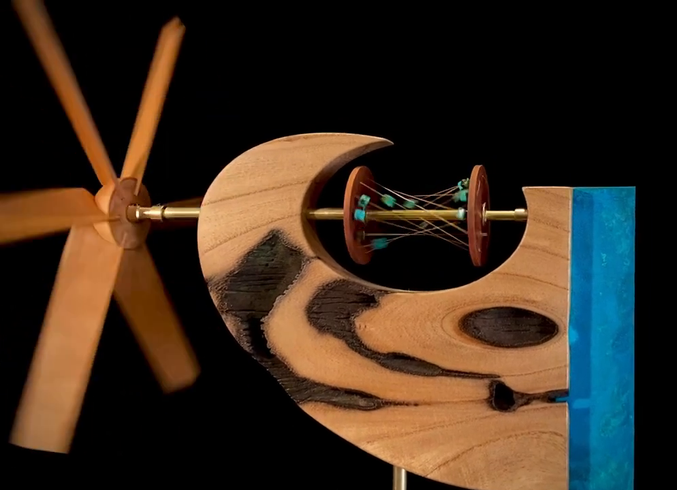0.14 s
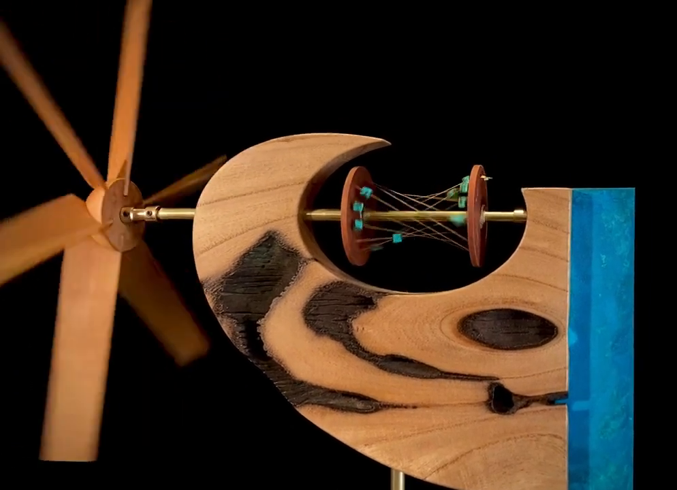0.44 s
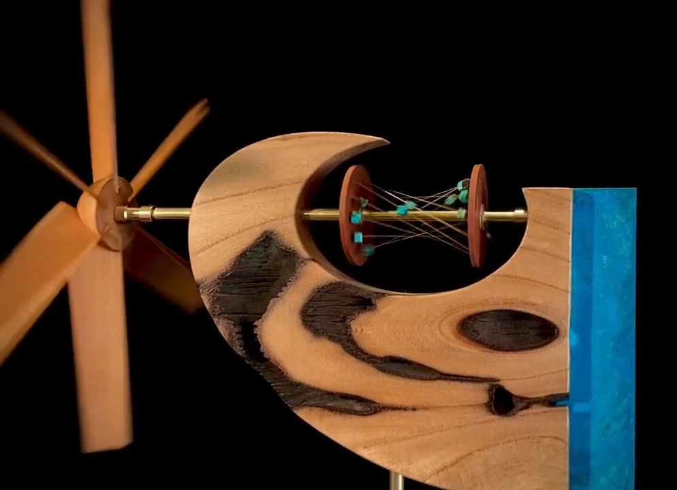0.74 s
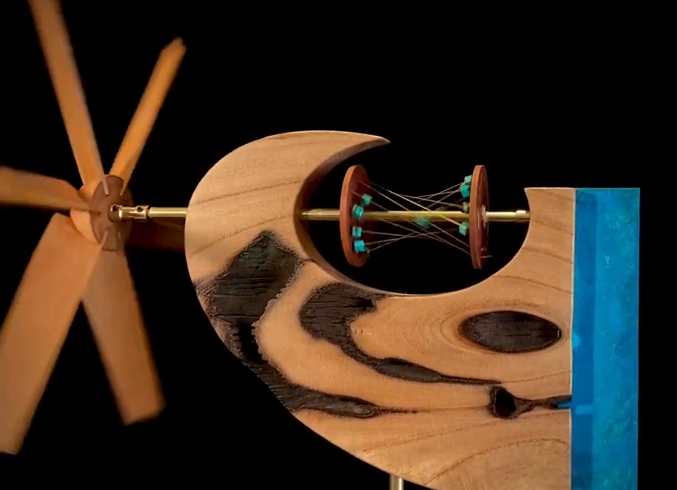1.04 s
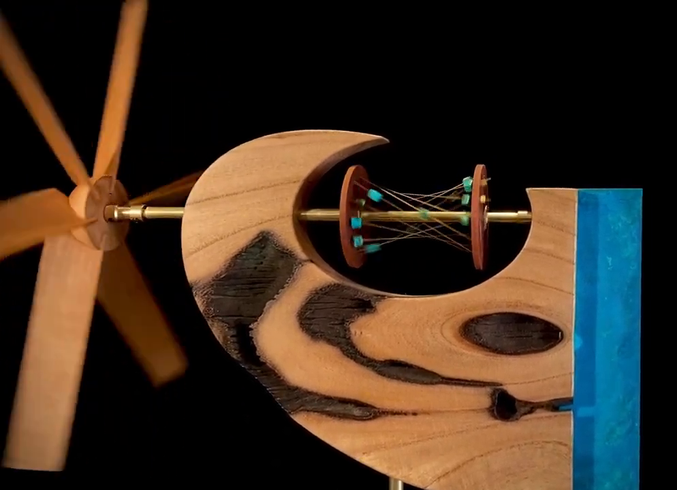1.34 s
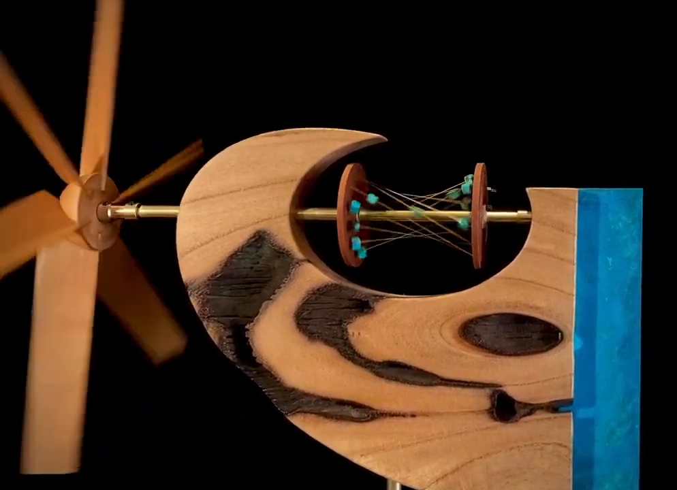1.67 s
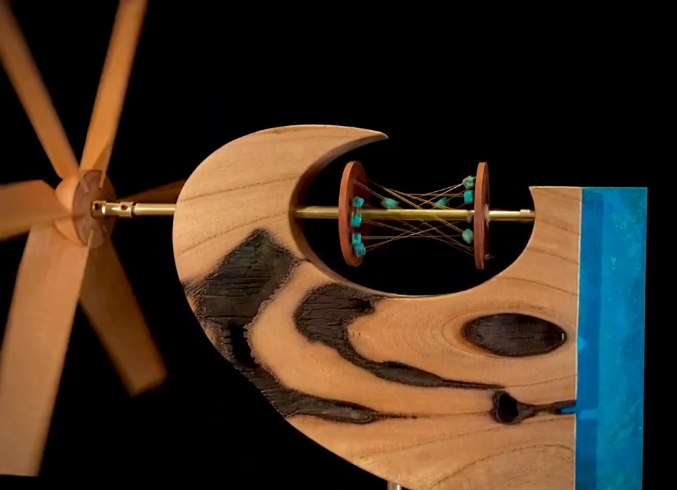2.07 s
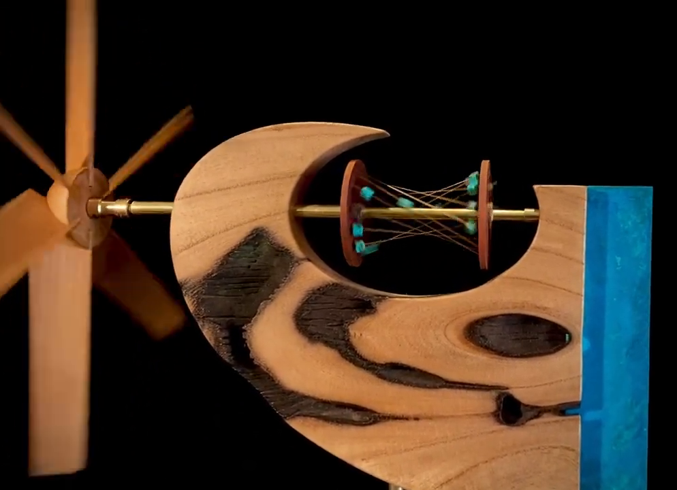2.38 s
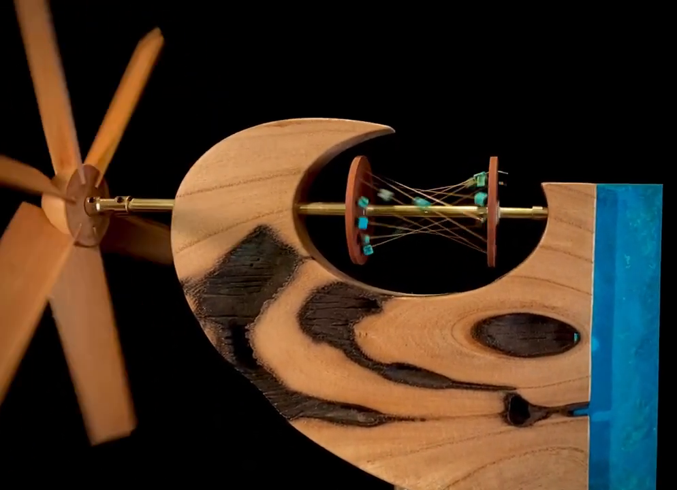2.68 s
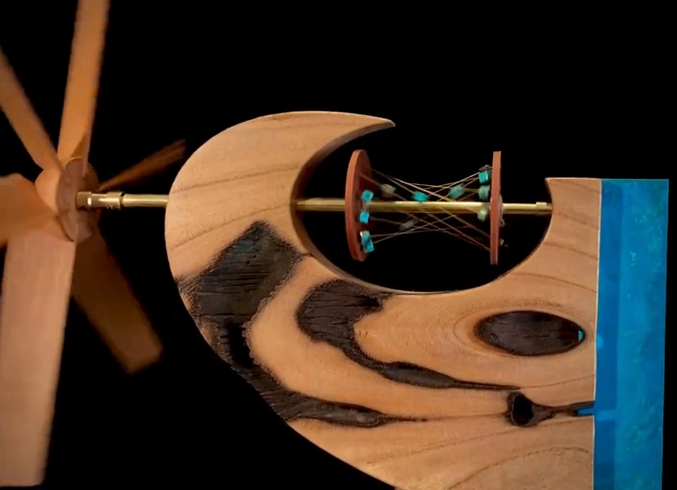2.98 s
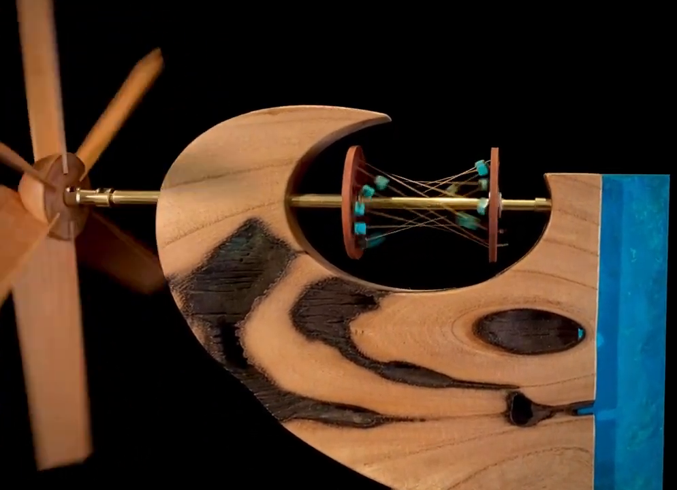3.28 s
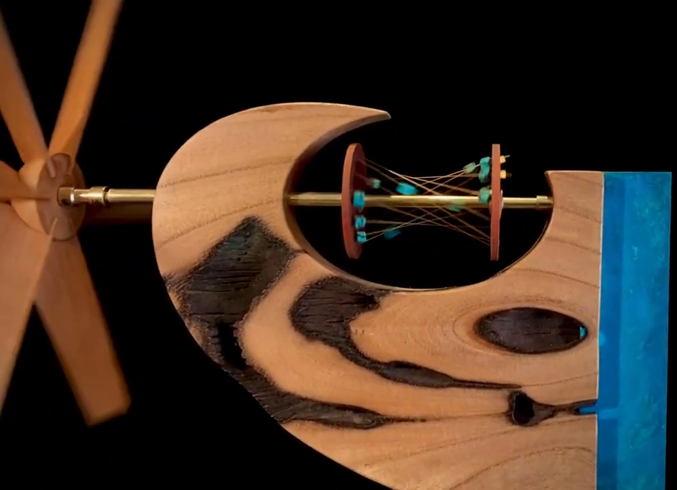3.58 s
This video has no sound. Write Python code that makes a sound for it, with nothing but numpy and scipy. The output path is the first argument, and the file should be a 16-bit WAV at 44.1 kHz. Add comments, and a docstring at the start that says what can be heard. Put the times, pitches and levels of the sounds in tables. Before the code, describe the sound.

Beads on a turning wooden spool rattle from 0 to about 3.7 seconds. Hard, bright ticks with short wooden clacks and thin brass ringing come in uneven clusters, near 0.1, 0.55, 1.0, 1.6, 2.1, 2.7 and 3.2. Between them, lighter clinks skitter along strings. Soft low frame bumps occur around 0.2, 0.7, 1.4, 1.7 and 2.8. Faint shaft rubbing, air and motor hum continue, close stereo, small room.

```python
"""A wooden whirligig turns a string spool in a small room; its shaft rubs over a low motor hum and soft air noise.
From the start, beads drop on its end discs: a hard tick, a short wooden clack and a thin ring of the brass shaft.
Soon the frame bumps softly, then beads clink together and skitter on along the strings; all this keeps recurring.
Faint touches fall at random times. Hard contacts are noise bursts through filters; wood and brass are fading
sine tones; rubbing and air are coloured noise. Two close microphones hear small differences in time and level."""
import sys
import numpy as np
from scipy import signal
from scipy.fft import rfft, irfft, next_fast_len
from scipy.io import wavfile
from scipy.ndimage import map_coordinates

SR = 44100
rng = np.random.default_rng(int(sys.argv[2]) if len(sys.argv) > 2 else 0)


def store_wav(level_fs):
    """Save 16-bit WAV to argv[1]."""
    pcm = np.round(np.clip(np.atleast_2d(level_fs), -1, 1) * 32767)
    wavfile.write(sys.argv[1], SR, pcm.T.astype(np.int16))


N = 164052  # length (samples)

# Left microphone's lead (s; below zero the right leads) and left-right balance (dB)
TICK_LEAD_S, TICK_PAN_DB = -0.000187, -0.2
WOOD_LEAD_S, WOOD_PAN_DB = 0.0003715, 2
WOOD_APART = 0.75  # size of the part that differs between microphones, against the shared part
# Room tail levels (dB) and the left-right difference of the tick's tail
TICK_WET_DB, WOOD_WET_DB, TICK_WET_APART = -11, -7.5, 0.32
SNAP_DB = 8  # typical first snap of a hard contact, against the noise after it


def amp(db):
    """Turn decibels into gain."""
    return 10 ** (np.asarray(db) / 20)


def unit(x):
    """Scale a steady sound to rms 1."""
    return x / np.sqrt(np.mean(x ** 2) + 1e-20)


def unit_hit(x, size=220):
    """Scale a hit to the energy of `size` samples at rms 1 (220 samples are 5 ms)."""
    return x / np.sqrt(np.sum(x ** 2) / size + 1e-20)


def along(points, hz):
    """Read a curve of (Hz, value) points, with frequency on a log axis."""
    point_hz, value = np.transpose(points)
    return np.interp(np.log(hz + 1), np.log(point_hz + 1), value)


def wobble(rate):
    """Draw a smooth random curve through `rate` random points a second."""
    points = rng.standard_normal(int(N * rate / SR) + 4)
    return map_coordinates(points, [np.arange(N) * rate / SR])


def filtered(x, response):
    """Change the strength and phase of each frequency in a long sound."""
    size = next_fast_len(N + SR // 4)
    hz = np.fft.rfftfreq(size, 1 / SR)
    return irfft(rfft(x, size) * response(hz), size)[..., :N]


def resonate(x, colour_db):
    """Colour a short sound by a dB curve, with the response starting at the hit rather than before it."""
    size = len(x)
    log_gain = colour_db(np.fft.rfftfreq(size, 1 / SR)) * np.log(10) / 20
    cepstrum = irfft(log_gain, size)
    # Keeping only the first half, doubled, makes the filter causal
    causal = 2 * cepstrum * (np.arange(size) < size // 2)
    return irfft(rfft(x) * np.exp(rfft(causal)), size)


def noise(spectrum):
    """Make coloured noise of rms 1."""
    return unit(filtered(rng.standard_normal(N), lambda hz: amp(along(spectrum, hz))))


def pair(shared, own, apart):
    """Make two channels from a shared sound and a part on which they differ."""
    return np.array([shared + apart * own, shared - apart * own]) / np.hypot(1, apart)


def place(x, lead_s, pan_db):
    """Set the delay and level between the two microphones."""
    side = np.array([[.5], [-.5]])
    return amp(side * pan_db) * filtered(x, lambda hz: np.exp(2j * np.pi * hz * side * lead_s))


def add(track, start_s, sound):
    """Mix a sound into a track, cutting off what falls outside it."""
    i = round(start_s * SR)
    sound = sound[..., max(-i, 0):]
    part = track[..., max(i, 0):][..., :sound.shape[-1]]
    part += sound[..., :part.shape[-1]]


def with_room(x, wet_db, apart, size=256, count=56):
    """Add two early reflections and a fresh noise tail whose pitches fade at different speeds."""
    # Early reflections: delay_s [s], level_db [dB], before small random changes
    walls = [(.0086, -17.5), (0.011, -18)]
    # Fading of the room: pitch_hz [Hz], t60_s [s to fall by 60 dB]
    room_fade = [(300, 0.23), (3000, 0.26), (9000, 0.27), (16000, 0.097)]
    hz = np.fft.rfftfreq(size, 1 / SR)
    block_s = np.arange(count)[:, None] * size / SR
    blocks = rfft(rng.standard_normal((2, count, size))) * amp(-60 * block_s / along(room_fade, hz))
    t = np.arange(count * size) / SR
    tail = irfft(blocks).reshape(2, -1) * (1 - np.exp(-(t / 0.0041) ** 2))  # soft start
    tail = pair(*tail, apart) / np.linalg.norm(tail[0])
    out = amp(wet_db) * signal.fftconvolve(x, tail, axes=1)
    add(out, 0, x)
    for delay_s, level_db in walls:
        add(out, delay_s + .0003 * rng.standard_normal(), amp(level_db + rng.normal(0, 1.3)) * x)
    return out


def chatter(t60_s, snap_db, size=2048):
    """Make the force of a hard contact: a snap, then a moment of spiky chatter."""
    t = np.arange(size) / SR
    spikes_db = 4 * rng.standard_normal(size)
    force = rng.standard_normal(size) * amp(spikes_db - 60 * t / t60_s)
    force[0] = amp(snap_db + rng.normal(0, 3.0))
    return force


def room_tone():
    """Mix noise for rumble and air with the slightly unsteady sine tones of a motor hum."""
    # Low room rumble: pitch_hz [Hz], relative level_db [dB]
    rumble_colour = [(20, -53), (40, -2), (70, 4), (130, -3.5), (180, -7), (500, -20), (1000, -27.5),
                     (4000, -65)]
    # Air noise: pitch_hz [Hz], relative level_db [dB]
    air_colour = [(150, 2.5), (350, -8), (700, 2.5), (1200, -6), (2500, -9.5), (8000, -38), (16000, -50)]
    # Motor hum tones: pitch_hz [Hz], average rms level_db [dB] before the left-right balance
    hum_tones = [(96.7, -61.5), (119.8, -62), (386.5, -77), (538, -85), (1007, -81)]
    t = np.arange(N) / SR
    hum = np.zeros(N)
    for pitch_hz, level_db in hum_tones:
        level = np.sqrt(2) * amp(level_db + 0.38 * wobble(5.3))
        hum += level * np.sin(2 * np.pi * pitch_hz * t + 0.24 * wobble(3.92))
    low = hum + amp(-58.5) * pair(noise(rumble_colour), noise(rumble_colour), 0.37)
    air = amp(-62) * pair(noise(air_colour), noise(air_colour), 0.52)
    return place(low, 0, 0.97) + place(air, WOOD_LEAD_S, 4)


def bearings():
    """Rub the shaft in the wooden frame: coloured noise that swells and fades a little."""
    # Rubbing noise: pitch_hz [Hz], relative level_db [dB]
    rub_colour = [(400, -27), (800, -3), (1300, -6), (1800, 0.5), (2200, -1.5), (2850, 1.5), (3300, -9),
                  (7500, -18), (11000, -70), (16000, -55)]
    level_db = -58 + 2 * wobble(14) + 2 * wobble(150)
    rub = pair(noise(rub_colour), noise(rub_colour), 0.43)
    return place(amp(level_db) * rub, WOOD_LEAD_S, 0.13)


def tick(pitch_hz):
    """Land a bead on a disc: a hard contact rings very briefly, high up, brighter around its own pitch."""
    # Bead tick before that emphasis: pitch_hz [Hz], relative level_db [dB]
    tick_colour = [(1000, -21.5), (6500, -20), (7700, 3), (8600, 5.5), (9600, -2.5), (10700, -1),
                   (11800, -4), (13000, 1.5), (14400, -2.5), (15600, -6), (16800, -33)]
    emphasis_db, width_hz = 5.5, 1900

    def colour_db(hz):
        return along(tick_colour, hz) + emphasis_db * np.exp(-((hz - pitch_hz) / width_hz) ** 2)

    return unit_hit(resonate(chatter(0.013, SNAP_DB), colour_db))


def clack(size=2048):
    """Strike the disc at a new spot each time: its natural tones fade beside a broad crack of noise."""
    # Natural tones of the wooden discs, before random changes:
    # pitch_hz [Hz], relative level_db [dB], t60_s [s to fall by 60 dB]
    disc_tones = [(1673, -13, 0.011), (2782, -15.5, 0.013), (3007, 2.5, 0.02), (2900, 3.5, 0.0073),
                  (3542, -3, 0.025), (3750, -5.5, 0.028), (4097, -5.5, 0.017), (4456, -6.5, 0.012),
                  (5010, -9.5, 0.036), (5440, -7.5, 0.017), (6720, -18.5, 0.042)]
    # Broad part of the clack: pitch_hz [Hz], relative level_db [dB]
    crack_colour = [(500, -12), (1400, -3.5), (3000, -5), (5300, 5), (7500, -1.5), (10000, -14)]
    attack_s, crack_t60_s, crack_db = 0.00097, 0.032, -6
    # Typical random spreads: pitch (fraction), each tone's level (dB), brightness (dB per octave)
    detune_spread, level_spread_db, brightness_spread_db = .022, 2.5, 4
    t = np.arange(size) / SR
    hz, level_db, t60_s = np.transpose(disc_tones)[:, :, None]
    detune, scatter, phase = rng.standard_normal((3, len(disc_tones), 1))
    octaves = np.log2(hz / hz[0])
    level_db = level_db + brightness_spread_db * rng.standard_normal() * octaves
    fade = amp(level_db + level_spread_db * scatter - 60 * t / t60_s)
    tones = fade * np.sin(2 * np.pi * (hz * (1 + detune_spread * detune) * t + phase))
    body = tones.sum(0) * (1 - np.exp(-t / attack_s))
    burst = rng.standard_normal(size) * amp(-60 * t / crack_t60_s)
    crack = resonate(burst, lambda f: along(crack_colour, f))
    return unit_hit(unit_hit(body) + amp(crack_db) * unit_hit(crack))


def shaft_ring(size=16384):
    """Ring the brass shaft thinly after a blow; turning in its bearings blurs the pitch."""
    # Natural tones of the shaft: pitch_hz [Hz], relative level_db [dB] before random changes,
    # t60_s [s to fall by 60 dB]
    shaft_tones = [(3120, -24, 0.068), (3560, -8, 0.15), (3648, 3, 0.3), (3740, -2, 0.26),
                   (4480, -12, 0.51)]
    attack_s, blur_width_hz = 0.00092, 65
    t = np.arange(size) / SR
    ring = np.zeros((2, size))
    for pitch_hz, level_db, t60_s in shaft_tones:
        # The phase strays in small random steps
        blur = np.cumsum(rng.standard_normal(size)) * np.sqrt(2 * np.pi * blur_width_hz / SR)
        fade = amp(level_db + rng.normal(0, 2.5) - 60 * t / t60_s)
        ring += fade * np.sin(2 * np.pi * (pitch_hz * t + rng.random((2, 1))) + blur)
    return np.sqrt(2) * ring * (1 - np.exp(-t / attack_s))


def bead_drops(ticks, wood):
    """Drop beads on the discs: each blow sounds bead, wood and shaft together."""
    # Drops: start_s [s], relative levels tick_db, clack_db, ring_db [dB] before the trims below,
    # tick pitch_hz [Hz]
    drop_list = [(-0.012, -38.5, -37.5, -57.5, 10400), (0.081, -38, -43, -56, 13300),
                 (0.0912, -39, -40.5, -64, 13700), (0.16, -40, -45, -56, 12500),
                 (0.5167, -41, -39.5, -62, 11200), (0.5272, -55, -45, -54, 10400),
                 (0.5475, -39.5, -36.5, -66, 10000), (0.563, -42.5, -42.5, -72, 11400),
                 (0.6434, -42, -42.5, -64, 12300), (0.9632, -39.5, -40, -67, 11400),
                 (0.9932, -35.5, -38, -51, 9500), (1.0622, -36.5, -38, -50, 13000),
                 (1.0823, -39, -40, -67, 9900), (1.1652, -41, -45, -55, 10400),
                 (1.5653, -39.5, -37.5, -52, 11300), (1.6053, -38, -37.5, -51, 10600),
                 (1.622, -38, -43, -51, 11600), (1.6851, -43, -43.5, -69, 12000),
                 (1.7453, -38, -42, -74, 11800), (2.012, -38.5, -40.5, -59, 11600),
                 (2.0453, -36, -37, -57.5, 9500), (2.1387, -38, -37.5, -54, 11500),
                 (2.162, -43, -39, -69, 9200), (2.249, -48, -46.5, -56, 10300),
                 (2.2577, -36, -44, -55, 11800), (2.6357, -43, -38.5, -56, 9200),
                 (2.657, -46, -47, -64, 10100), (2.6772, -35.5, -39.5, -51, 11300),
                 (2.6918, -39, -40.5, -60, 11100), (2.775, -35.5, -41.5, -76, 12800),
                 (2.823, -38, -42.5, -68, 11400), (3.099, -40.5, -40, -75, 11500),
                 (3.156, -33.5, -37.5, -54, 9700), (3.2001, -44, -40.5, -61, 9500),
                 (3.2432, -42, -37, -66, 11800), (3.276, -42, -43.5, -53, 9150),
                 (3.3573, -33, -38, -55, 11400), (3.6862, -42.5, -42.5, -74, 10800)]
    tick_trim_db, clack_trim_db, ring_trim_db = 1.5, 2, 3.5
    for start_s, tick_db, clack_db, ring_db, pitch_hz in drop_list:
        bead = tick(pitch_hz)
        bead = with_room(np.array([bead, bead]), TICK_WET_DB, TICK_WET_APART)
        disc = with_room(pair(clack(), clack(), WOOD_APART), WOOD_WET_DB, 0.78)
        add(ticks, start_s, amp(tick_db + tick_trim_db) * bead)
        add(wood, start_s, amp(clack_db + clack_trim_db) * disc)
        add(wood, start_s, amp(ring_db + ring_trim_db) * shaft_ring())


def frame(size=8192):
    """Knock the frame as it rocks: low thuds die in a cycle or two, with a wooden contact noise."""
    # Bumps: start_s [s], thud level_db [dB], pitch_hz [Hz]
    bump_list = [(0.126, -53, 109), (0.185, -53, 72.6), (0.235, -50.5, 87), (0.681, -50.5, 149),
                 (0.823, -60, 200), (1.405, -57, 192), (1.42, -54, 78), (1.667, -57.5, 175),
                 (1.686, -50, 78), (2.705, -49, 92), (2.835, -48, 102)]
    # Wooden contact of each bump: pitch_hz [Hz], relative level_db [dB]
    knock_colour = [(60, -9), (170, 0.5), (400, -6), (1000, -19.5)]
    rise_s, fade_cycles, knock_t60_s, knock_db = 0.0021, 1.3, 0.047, -7
    out, t = np.zeros(N), np.arange(size) / SR
    for start_s, level_db, pitch_hz in bump_list:
        envelope = np.exp(-pitch_hz * t / fade_cycles) * (1 - np.exp(-t / rise_s))
        thud = np.cos(2 * np.pi * (pitch_hz * t + rng.random())) * envelope
        burst = rng.standard_normal(size) * amp(-60 * t / knock_t60_s)
        contact = resonate(burst, lambda hz: along(knock_colour, hz))
        bump = unit_hit(thud, size=800) + amp(knock_db) * unit_hit(contact, size=800)
        add(out, start_s, amp(level_db) * bump)
    return out


def clink(spectrum, skitter_db, size=8192):
    """Make a hard contact that skitters on in ever fainter random grains."""
    grains_per_s, skitter_t60_s, detune_spread = 350, 0.21, .02
    t = np.arange(size) / SR
    touches = rng.random(size) < grains_per_s / SR
    grains = touches * rng.standard_normal(size) * amp(-60 * t / skitter_t60_s)
    force = amp(skitter_db) * unit_hit(grains)
    add(force, 0, unit_hit(chatter(0.015, SNAP_DB)))
    # A larger value moves the whole colour lower in pitch
    size_factor = np.exp(detune_spread * rng.standard_normal())
    return unit_hit(resonate(force, lambda hz: along(spectrum, hz * size_factor)))


def bead_clink():
    """Let a bead meet its neighbour: a crisp, high contact with a faint skitter."""
    # Crisp band of a clink before detuning: pitch_hz [Hz], relative level_db [dB]
    clink_colour = [(7000, -27), (8800, 0.5), (9700, -2), (10500, 5.5), (12100, -0.5), (13200, -4.5),
                    (14500, -19), (15600, -11), (16600, -68)]
    return clink(clink_colour, -18.5)


def spool_answer():
    """Let the spool answer a clink: a softer, lower contact with a stronger skitter."""
    # Soft answer of the spool before detuning: pitch_hz [Hz], relative level_db [dB]
    spool_colour = [(600, -24.5), (1300, -12), (2200, -14), (2850, 0.5), (3300, -3), (4200, -10),
                    (5100, -9.5), (9000, -25.5)]
    return clink(spool_colour, -3.5)


def bead_clinks(ticks, wood):
    """Clink beads together, with the spool answering at the same moment."""
    # Clinks: start_s [s], relative levels bead_db and spool_db [dB]; the spool gets the trim below
    clink_list = [(0.2343, -45, -46.5), (0.3056, -41, -44), (0.3495, -53, -45), (0.3871, -46, -51),
                  (0.4667, -44.5, -49), (0.7154, -44.5, -47), (0.7833, -38, -43), (0.8213, -57, -47.5),
                  (0.917, -41.5, -43.5), (1.2118, -45, -42.5), (1.3074, -37.5, -40.5), (1.4073, -39, -45),
                  (1.4271, -44.5, -47), (1.4748, -41.5, -42), (1.484, -47, -45), (1.8125, -35.5, -44),
                  (1.8792, -50, -44.5), (1.8895, -39, -41.5), (1.9206, -39, -45.5), (2.345, -37.5, -43),
                  (2.426, -46, -51), (2.4427, -42, -43), (2.4508, -36.5, -43.5), (2.548, -41, -45),
                  (2.559, -48, -42), (2.8896, -36.5, -41), (2.941, -43, -41.5), (2.986, -40, -41),
                  (3.03, -36.5, -42.5), (3.143, -46, -47), (3.4636, -38.5, -42), (3.5206, -45, -47.5),
                  (3.5591, -38.5, -42.5), (3.5815, -41.5, -46)]
    spool_trim_db = 1
    for start_s, bead_db, spool_db in clink_list:
        bead = bead_clink()
        bead = with_room(np.array([bead, bead]), TICK_WET_DB, TICK_WET_APART)
        spool = with_room(pair(spool_answer(), spool_answer(), WOOD_APART), WOOD_WET_DB, 1.0)
        add(ticks, start_s, amp(bead_db) * bead)
        add(wood, start_s, amp(spool_db + spool_trim_db) * spool)


def jostling(ticks, wood):
    """Scatter faint bead and spool touches at random times, without room echoes."""
    touches_per_s, faintest_db, range_db = 16, -59, 10
    for when, strength in rng.random((int(touches_per_s * N / SR), 2)):
        start_s = when * N / SR
        gain = amp(faintest_db + range_db * strength)
        add(ticks, start_s, gain * bead_clink())
        add(wood, start_s, gain * spool_answer())


def beads():
    """Place the bead contacts, and the wood and shaft sounds, each with its own delay and balance."""
    ticks, wood = np.zeros((2, 2, N))
    bead_drops(ticks, wood)
    bead_clinks(ticks, wood)
    jostling(ticks, wood)
    return place(ticks, TICK_LEAD_S, TICK_PAN_DB) + place(wood, WOOD_LEAD_S, WOOD_PAN_DB)


def scene():
    """Put the whirligig in its room."""
    return room_tone() + bearings() + beads() + frame()


def record(dry):
    """Remove everything from 16.7 kHz upward."""
    return filtered(dry, lambda hz: hz < 16700)


dry = scene()
out = record(dry)
store_wav(out)
```